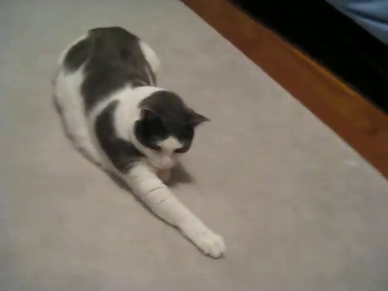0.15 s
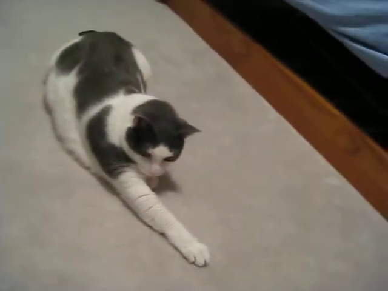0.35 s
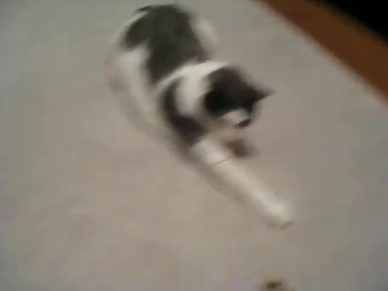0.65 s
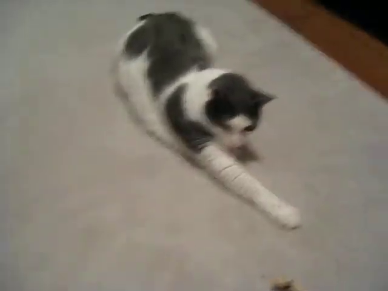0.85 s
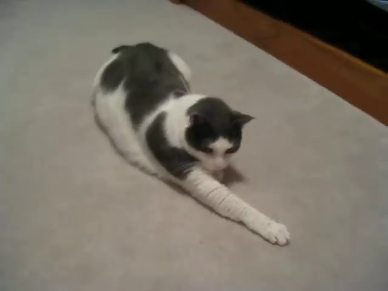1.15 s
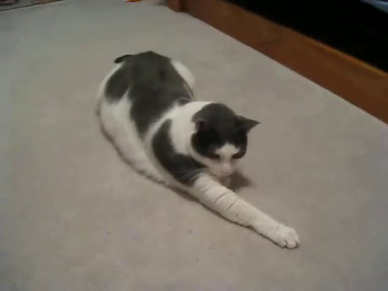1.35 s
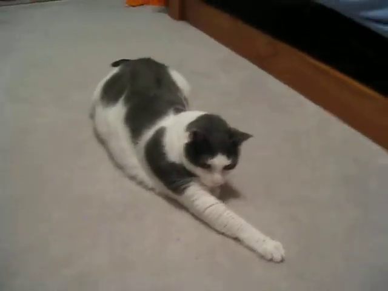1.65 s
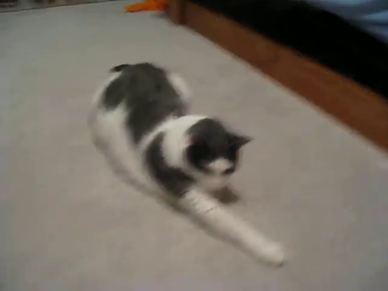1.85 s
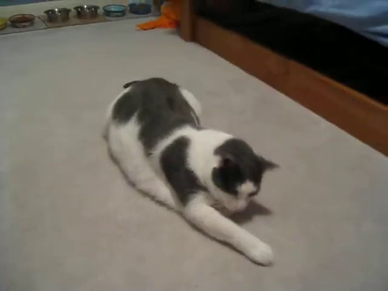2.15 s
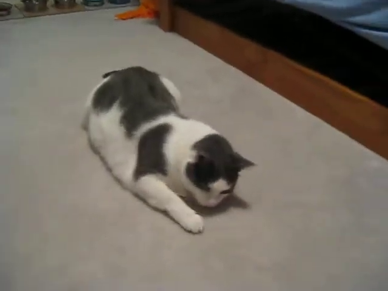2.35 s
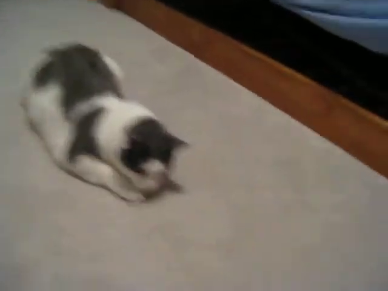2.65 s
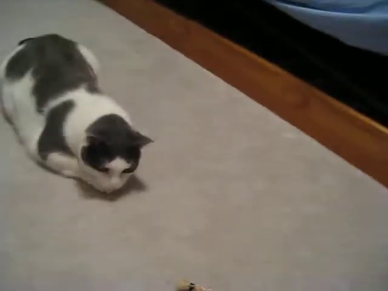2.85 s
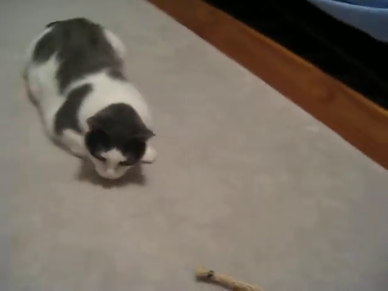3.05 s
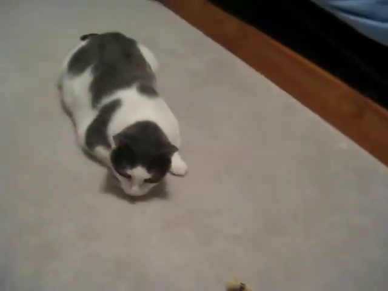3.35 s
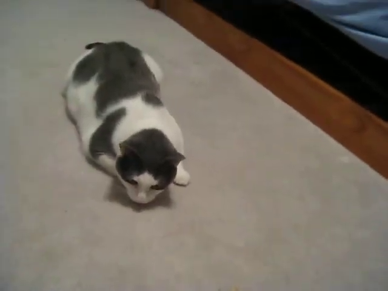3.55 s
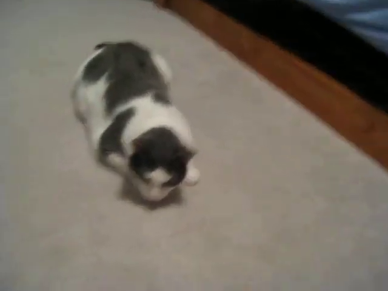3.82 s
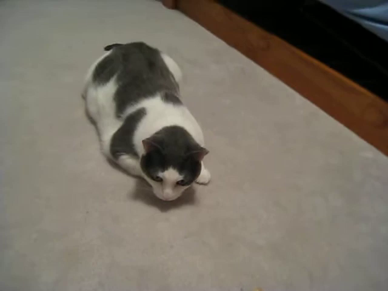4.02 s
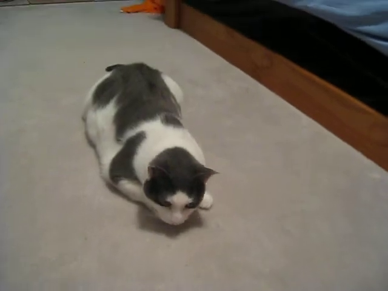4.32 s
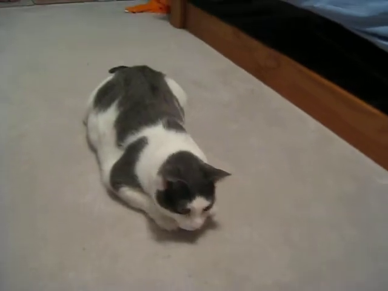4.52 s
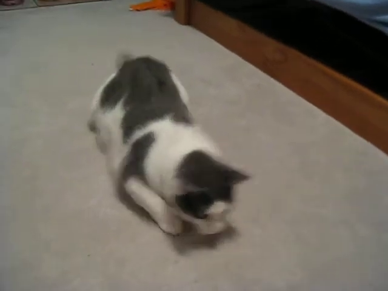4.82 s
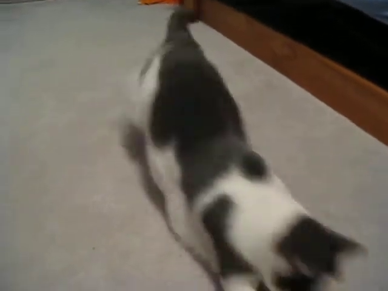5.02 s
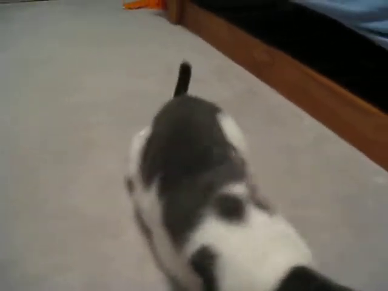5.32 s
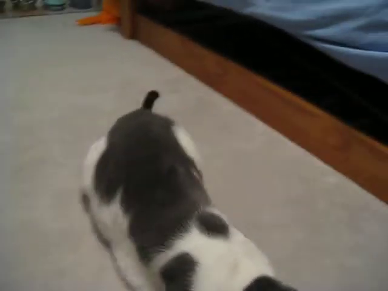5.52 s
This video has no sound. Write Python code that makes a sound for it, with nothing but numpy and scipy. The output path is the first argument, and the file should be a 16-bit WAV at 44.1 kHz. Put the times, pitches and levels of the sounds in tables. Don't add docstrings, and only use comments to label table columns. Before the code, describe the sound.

Low-grade handheld microphone with constant hiss. Loud, dry handling clicks and short scratchy scuffs open, thin out, then cluster again with dull bumps before two seconds. Lighter nail taps and a small strap-ring chink follow, then a sharp overloading knock. Near the end, muffled cat paws land on carpet, with faint dry crackles.

```python
import sys
import numpy as np
from scipy import signal
from scipy.fft import rfft, irfft, next_fast_len
from scipy.io import wavfile
from scipy.ndimage import uniform_filter1d, map_coordinates

SR = 44100
rng = np.random.default_rng(int(sys.argv[2]) if len(sys.argv) > 2 else 0)


def unload_audio(sound):
    columns = np.transpose(np.atleast_2d(sound))
    steps = np.round(np.clip(columns, -1, 1) * 32767)
    wavfile.write(sys.argv[1], SR, steps.astype(np.int16))


def field_ratio(decibels):
    return 10 ** (np.asarray(decibels, dtype=float) / 20)


N = 250488

# frequency in Hz, bandwidth in Hz, level in dB.
PANEL = [(727, 160, -4), (883, 116, 0.5), (1116, 287, -2), (1974, 350, -5)]
CAVITY = [(1450, 254, -4), (1701, 87, 1), (1924, 130, -8)]
LOW_RIBS = [(2650, 380, 7), (3294, 180, 7.5), (3840, 470, 4.5), (4850, 420, -3)]
HIGH_RIBS = [(5490, 920, 0.5), (6140, 1840, -3.6)]
FIZZ = [(9030, 1600, -0.1), (12600, 3300, 0), (14900, 1830, -1)]
PARTS = PANEL, CAVITY, LOW_RIBS, HIGH_RIBS, FIZZ


def unit(x):
    return x / np.sqrt(np.mean(x ** 2) + 1e-20)


def along(points, hz):
    f, v = np.transpose(points)
    return np.interp(np.log(hz + 1), np.log(f + 1), v)


def envelope(rows):
    s, db = np.transpose(rows)
    out = np.zeros(N)
    inside = np.arange(round(s[0] * SR), round(s[-1] * SR))
    out[inside] = field_ratio(np.interp(inside / SR, s, db))
    return out


def wobble(rate):
    knots = rng.standard_normal(int(N * rate / SR) + 4)
    return map_coordinates(knots, [np.arange(N) * rate / SR])


def filtered(x, response):
    m = next_fast_len(N + 8192)
    return irfft(rfft(x, m) * response(np.fft.rfftfreq(m, 1 / SR)), m)[..., :N]


def modal(modes, f):
    h = 0
    for k, (centre, width, db) in enumerate(modes):
        damping = 1j * f * width
        h = h + (-1) ** k * field_ratio(db) * damping / (centre * centre - f * f + damping)
    return h / np.sqrt(np.mean(abs(h) ** 2))


def ringing(x, modes):
    return filtered(x, lambda f: modal(modes, f))


def coloured(spectrum):
    return unit(filtered(rng.standard_normal(N), lambda hz: field_ratio(along(spectrum, hz))))


def room():
    # frequency in Hz, spectral level in dB.
    hiss_spectrum = [(25, -1.5), (150, 2), (500, -0.5), (900, 0), (2500, -5.5), (5500, -10.5), (9500, -15),
                     (10900, -14), (14700, -20.5), (16000, -13)]
    # resonance in Hz, bandwidth in Hz, level in dB.
    air_modes = [(1210, 80, -2), (1410, 150, -3), (1712, 55, 1)]
    hiss_db = -54.5
    air = field_ratio(-8.5) * ringing(rng.standard_normal(N), air_modes)
    drift = field_ratio(0.3 * wobble(3))
    return field_ratio(hiss_db) * drift * (coloured(hiss_spectrum) + air)


def stroke(s, length, db, peak, rise_db, fall_db):
    out = np.zeros((5, N))
    i = np.arange(round(s * SR), round((s + length) * SR))
    u = (i / SR - s) / length
    peak = np.clip(peak, 0.02, 0.98)
    rising = np.c_[rise_db] * (1 - u / peak)
    falling = np.c_[fall_db] * (u - peak) / (1 - peak)
    out[:, i] = field_ratio(np.c_[db] - np.where(u < peak, rising, falling)) ** 2
    return out


def rub_level():
    # start in seconds, length in seconds, peak in dB,
    # low ribs in dB beside it, panel in dB beside it.
    pushes = [
        (0, 0.019, -31, -17, -8.5),
        (.81, .1, -40, -16, -18),
        (1.555, 0.13, -44, -7, -18),
        (1.65, 0.066, -42.5, -12, -16),
        (2.225, 0.062, -35.5, -6, -19.5),
        (3.57, 0.019, -48, -10, -9),
        (3.878, 0.039, -32, -8.5, -20),
    ]
    drags = [(.036, 0.045, -31.5, -18, -12), (.072, 0.071, -35, -17.5, -13.5), (.5, 0.14, -40, -14, -18.5),
             (.66, 0.24, -45, -12, -14.5), (1.33, 0.12, -48.5, -13, -6), (1.474, 0.059, -55, 1.5, 1.5),
             (1.776, 0.021, -43, -13, -14), (1.843, 0.093, -43.5, -18, -16),
             (2.328, 0.048, -38, -19, -14.5), (2.372, .02, -46.5, -14, -7), (3.6, 0.011, -44, -19, -3),
             (3.678, 0.058, -49, -10, -9)]
    sways = [
        (.275, 0.14, -39, -20, -17.5),
        (.468, 0.041, -42, -25, -15),
        (.57, 0.12, -40.5, -7.5, -18),
        (1.215, 0.099, -43.5, -21, -14),
        (2.18, 0.1, -39, -8.5, -19.5),
        (2.53, 0.24, -47.5, -20, -16.5),
        (2.725, 0.045, -53, -10, -4.5),
        (3.775, 0.1, -51, -10, -15),
    ]
    # start in seconds, length in seconds, peak in dB,
    # tilt in dB towards the fizz, peak position as a share of the length.
    brushes = [(0.069, 0.048, -54, -9, .5), (0.483, 0.13, -49, -0.5, 0.067), (.58, 0.076, -58, -8, .3),
               (0.817, 0.096, -45.5, -5, 0.89), (1.56, 0.063, -57, -12, .3),
               (2.198, 0.091, -42, -5.5, 0.65), (2.314, 0.039, -50, -7, .3), (2.395, 0.091, -58, 0, 0.42),
               (2.642, 0.049, -57, -14, 0.4), (2.73, 0.056, -54.5, 6, .55), (3.554, .045, -64, -5, 0.73),
               (3.88, 0.039, -41.5, -12, 0.65), (3.925, 0.015, -39.5, -20, 0.23)]
    push = (0.81, 11.3, 6.3)
    drag = (0.18, 10, 14.3)
    sway = (0.54, 10.3, 16.3)
    high_db, fizz_db = -8, -13.5
    grow = np.array([1, 1, 1.12, 1.12, 1.12])
    power = np.zeros((5, N))
    for rows, (peak, rise, fall) in [(pushes, push), (drags, drag), (sways, sway)]:
        for s, length, db, low, panel in rows:
            parts_db = db + np.array([panel, 0, low, low + high_db, low + fizz_db])
            power += stroke(s, length, parts_db, peak, rise * grow, fall * grow)
    edge = 15 * np.ones(5)
    for s, length, db, tilt, peak in brushes:
        parts_db = db + np.array([-99, -99, -1.5, 0, tilt])
        power += stroke(s, length, parts_db, peak, edge, edge)
    return np.sqrt(np.abs(uniform_filter1d(power, size=90)))


def rubs():
    creak = unit(field_ratio(2.5 * wobble(300) + 0.8 * wobble(70)))
    hiss = unit(field_ratio(1.5 * wobble(500) + 0.7 * wobble(70)))
    grain = np.array([creak, creak, hiss, hiss, hiss])
    force = rub_level() * grain * rng.standard_normal((5, N))
    force[0] = uniform_filter1d(force[0], size=16) * 16 ** 0.5
    return force


def touches():
    # time in seconds, energy in dB,
    # then cavity, low ribs and edge (high ribs) in dB beside it.
    pats = [(0.0152, 2, 5, -26, -19.5), (0.0281, -7.5, -2, -7, -15.5), (0.0489, -19.5, 12, -13, -21),
            (.164, .5, -1.5, -13.5, -19), (0.5241, -1.5, -32, -11.5, -43), (1.4755, -10.5, -33, -9.5, -28),
            (1.6494, -13, 4.5, 1.5, -17), (2.599, -21.5, -3, -9, -19), (2.901, -16.5, -3.5, -30, -34),
            (3.874, -18, -7, 3.5, -22), (3.8883, -11, -1, 8.5, -5), (5.023, -17, -29, -18, -18)]
    # time in seconds, length in ms, energy in dB,
    # low ribs in dB beside it, edge in dB beside it.
    skids = [(0.041, 5.2, -11, -29, -26), (.071, 5.2, -5.5, -19, -25), (.299, 9.1, -14.5, -14, -23),
             (0.337, 3.9, -6, -14.5, -21.5), (1.045, 3.7, -21.5, -20, -24), (1.231, 8.8, -19, -29, -32),
             (1.269, 2.1, -29, -10, -23), (1.28, 7.9, -19, -25, -32), (1.333, 2.6, -15, -14, -37),
             (1.365, 1.5, -30, 0, -12), (1.673, 24, -16.5, 4.5, -14), (1.692, 3.1, -13, -17, -17),
             (1.718, 5.2, -2, -14, -21), (1.731, 21.4, -4, -19, -22), (1.755, 10.7, -6, -17, -24),
             (1.77, 8.6, -9, -25, -23), (1.8, 25, -8.5, -13, -28), (1.808, 18.5, -1, -17, -21),
             (1.832, 6.8, -2.5, -18, -20.5), (3.058, 3, -22.5, -13, -32), (3.593, 10, -10.5, -8, -19),
             (3.886, 1.15, -8.5, -18, -30), (3.925, 13.4, -9.5, -25, -12)]
    # time in seconds, energy in dB, low ribs and edge in dB beside it.
    nails = [(.486, -13, -5.5, -27), (0.5916, -15, -24, -22), (1.0636, -9, -9.5, -19),
             (1.3294, -16, -35, -35), (1.342, -15, -15, -34), (1.356, -21, -17, -30),
             (1.957, -19, -26, -33), (2.3173, -21.5, -15, -8), (2.339, -8.5, -33, -24),
             (2.387, -13, -19, -26), (2.4941, -14.5, -7.5, -17), (2.653, -12.5, -6, -34),
             (2.663, -12, -34, -36), (2.733, -19.5, -30, -29), (2.7911, -19, -21, -29),
             (3.594, -20, -3.5, -22), (3.7401, -25, -7, -18), (3.8015, -14, -22, -17),
             (3.816, -20, -24, -25)]
    # time in seconds, energy in dB, shell in dB beside it.
    ticks = [(.6633, -35, -9), (.6713, -28, -9), (1.592, -30, -10), (2.486, -34, -2), (3.577, -27.5, -9.5),
             (5.235, -31, -8), (5.257, -31, -13), (5.3237, -29, -16), (5.3773, -30, -4), (5.4087, -32, -13),
             (5.4564, -35, -14)]
    # time in seconds, cavity energy in dB, rattle in dB.
    blows = [
        (3.752, -6, -10),
        (3.7543, 6, -1),
        (3.7566, 16.5, 1),
    ]
    rattle_db = [-16, -12.5, -16.5, -33]
    nail_panel_db, skid_panel_db = -17, -10.5
    tap_fizz_db, skid_fizz_db = -6, -0.5
    rows = []
    for s, db, low, edge in nails:
        rows.append((s, 1, db + nail_panel_db, db, db + low, db + edge, db + edge + tap_fizz_db))
    for s, db, air, low, edge in pats:
        rows.append((s, 1, db, db + air, db + low, db + edge, db + edge + tap_fizz_db))
    for s, db, body in ticks:
        rows.append((s, 1, db + body - 12, db + body, db + body - 8, db + body, db))
    for s, db, rattle in blows:
        panel, *others = rattle + np.array(rattle_db)
        rows.append((s, 1, panel, db, *others))
    for s, ms, db, low, edge in skids:
        rows.append((s, ms, db + skid_panel_db, db, db + low, db + edge, db + edge + skid_fizz_db))
    return rows


def contacts():
    t = np.arange(1400) / SR
    force = np.zeros((5, N + SR))
    freqs = np.fft.rfftfreq(len(t), 1 / SR)
    heard = np.array([abs(modal(part, freqs)) for part in PARTS])
    for s, ms, *dbs in touches():
        window = np.sin(np.pi * np.clip(t * 1000 / ms, 0, 1) ** 0.8) ** 0.6
        burst = rng.standard_normal((5, len(t))) * window
        if ms == 1:
            burst[:2] = t * np.exp(-t / 0.00007)
        energy = np.mean(abs(rfft(burst) * heard) ** 2, axis=1, keepdims=True)
        burst /= np.sqrt(energy)
        start = round((s - 0.0006) * SR)
        force[:, start:start + len(t)] += field_ratio(np.array(dbs))[:, None] * burst
    return force[:, :N]


def shell():
    forces = contacts() + rubs()
    panel, cavity, low, high, fizz = (ringing(f, part) for f, part in zip(forces, PARTS))

    def port(f):
        return 1j * f * 1400 / (1620 ** 2 - f * f + 1j * f * 1400)

    def stiffness(f):
        bass_cut = (1j * f / (350 + 1j * f)) ** 2
        return bass_cut / (1 + 1j * f / 9000 - (f / 7000) ** 2)

    cavity = filtered(cavity, port)
    solid = cavity - panel + low + high
    return filtered(solid, stiffness) + fizz


def bumps():
    # time in seconds, frequency in Hz, level in dB.
    pushes = [
        (1.7192, 298, -41.5),
        (1.819, 278, -47),
        (1.834, 150, -52),
        (3.7554, 334, -42),
        (4.945, 220, -53),
        (5.023, 310, -48),
        (5.077, 90, -53),
        (5.11, 130, -44.5),
        (5.122, 131, -49),
        (5.126, 325, -44),
    ]
    out, t = np.zeros(N), np.arange(SR // 10) / SR
    for s, hz, db in pushes:
        push = field_ratio(db + 10.5) * np.sin(2 * np.pi * hz * t) * np.exp(-t * hz * 1.68)
        out[round(s * SR):][:len(t)] += push
    return filtered(out, lambda f: 1j * f / (60 + 1j * f))


def strap_ring():
    # start in seconds, frequency in Hz, level in dB, 60 dB decay time in seconds.
    chinks = [
        (2.4937, 3418, -42, .08),
        (2.4937, 4070, -46, .09),
        (2.4937, 4996, -39, .06),
        (2.4937, 7050, -42, .025),
        (2.4665, 6200, -37, .015),
        (2.44, 4500, -41, .05),
        (2.436, 6250, -46, .08),
        (3.7395, 4050, -48, .06),
    ]
    out, t = np.zeros(N), np.arange(SR // 8) / SR
    for s, hz, db, t60 in chinks:
        onset = 1 - np.exp(-t / 0.00033)
        out[round(s * SR):][:len(t)] += field_ratio(db - 60 * t / t60) * np.sin(2 * np.pi * hz * t) * onset
    return out * field_ratio(3 * wobble(250))


def cat():
    # time in seconds, level in dB.
    paw_levels = [
        (4.8, -66),
        (4.9, -61),
        (4.948, -49),
        (4.99, -61),
        (5.06, -51.5),
        (5.116, -47),
        (5.26, -62),
        (5.55, -73),
    ]
    # time in seconds, level in dB.
    fur_levels = [
        (4.8, -77),
        (4.948, -57.5),
        (5.26, -56.5),
        (5.55, -73),
    ]
    # frequency in Hz, spectral level in dB.
    thud_spectrum = [(40, -5), (110, -2), (400, -8), (1300, -5.5), (2600, -10.5), (4000, -22)]
    swish_spectrum = [(600, 1), (1500, 4), (4000, 0), (9000, 1.5), (13000, 0), (16000, 2)]
    thud = unit(field_ratio(2 * wobble(45)) * coloured(thud_spectrum))
    swish = unit(field_ratio(1.2 * wobble(70) + 1.5 * wobble(200)) * coloured(swish_spectrum))
    return envelope(paw_levels) * thud + field_ratio(3) * envelope(fur_levels) * swish


def scene():
    return (room() + shell() + bumps() + strap_ring() + cat())[None]


def band_limit(x):
    return signal.sosfilt(signal.butter(12, 16510, fs=SR, output="sos"), x)


def record(dry):
    notch_hz, notch_width_hz, top_hz = 7867, 1500, 15800
    scan_hz, scan_db = 15734.1, -83
    recovery_s = 0.09
    over = np.maximum(abs(dry) - 0.6, 0)
    duck_db = signal.lfilter([0.3], [1, -np.exp(-1 / (recovery_s * SR))], over)
    x = dry * field_ratio(-np.minimum(duck_db, 9))
    x = x / (1 + abs(x / 0.72) ** 8) ** (1 / 8)

    def notch(f):
        detuning = notch_hz ** 2 - f * f
        return detuning / (detuning + 1j * f * notch_width_hz) * (f < top_hz)

    scan_tone = field_ratio(scan_db) * np.sin(2 * np.pi * scan_hz * np.arange(N) / SR)
    return band_limit(filtered(x, notch) + scan_tone)


dry = scene()
out = record(dry)
unload_audio(out)
```